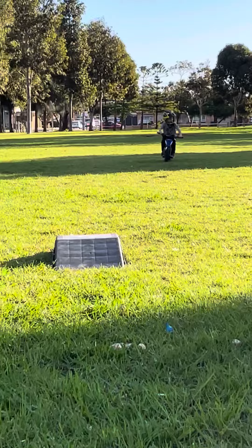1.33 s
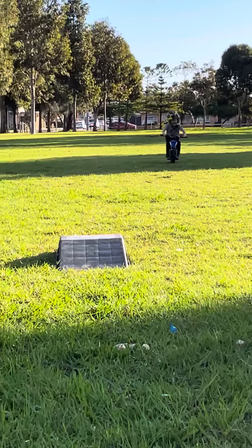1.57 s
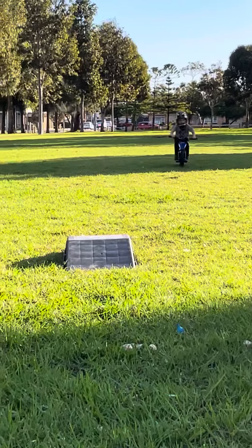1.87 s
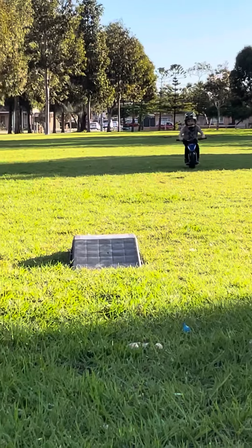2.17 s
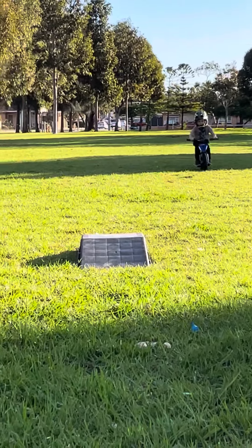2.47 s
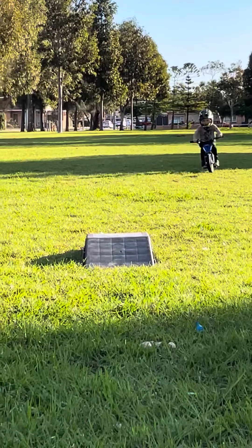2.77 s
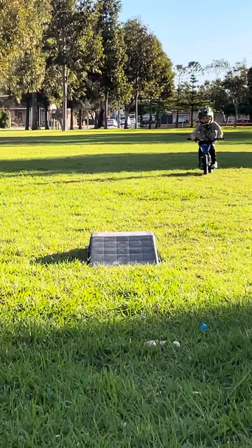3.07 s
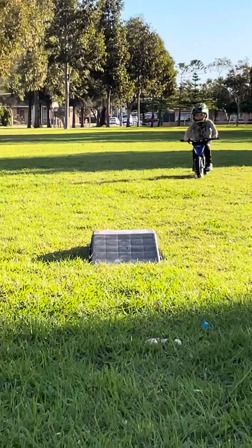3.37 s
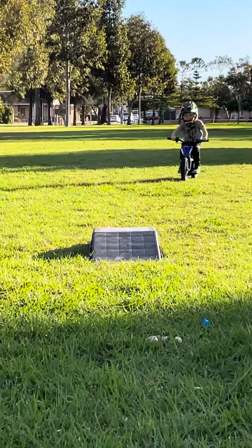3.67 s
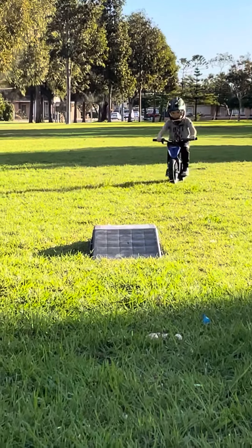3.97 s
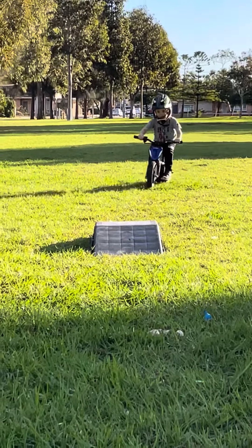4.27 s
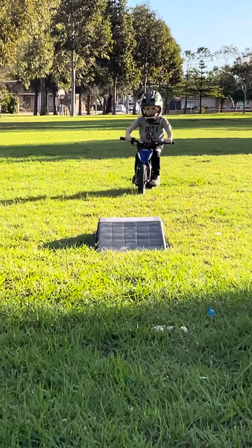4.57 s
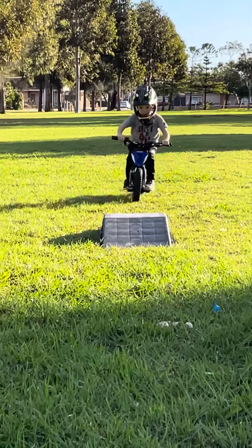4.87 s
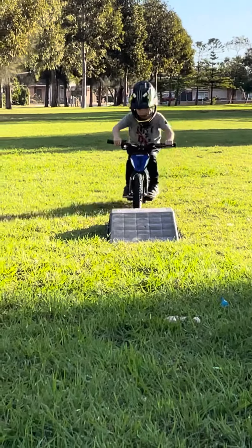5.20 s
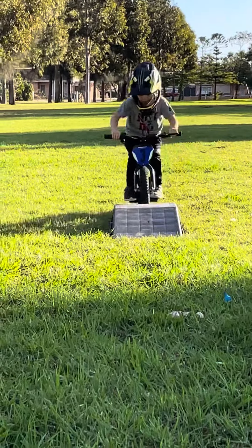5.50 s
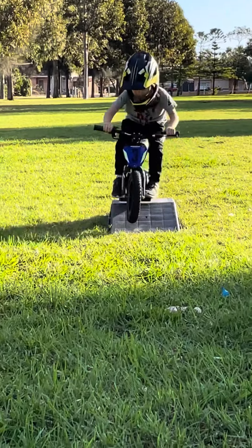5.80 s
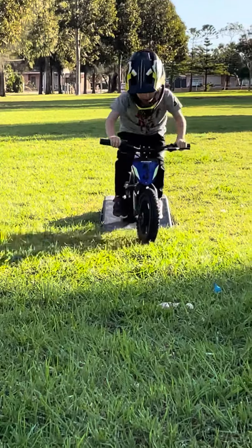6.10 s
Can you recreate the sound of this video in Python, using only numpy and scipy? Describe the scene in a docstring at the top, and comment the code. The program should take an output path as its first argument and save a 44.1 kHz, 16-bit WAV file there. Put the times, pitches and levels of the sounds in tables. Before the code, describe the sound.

An open park lawn, about six seconds long. Throughout, two distant engines drone low over the soft rumble and tyre wash of a road, one rising in pitch around 3 seconds. Small birds whistle, chirp and twitter faintly, echoing among trees. From about 1.2 seconds gusts buffet the microphone with bassy pops, strongest near 3 seconds, then lighter until about 5.4. From around 2.3 seconds grass crackles and snaps softly under the tyres of a small approaching bike. A sharp clack comes at 4.7 seconds. Between 5.4 and 5.7 the wheels drum and knock lightly over a low hollow ramp. At about 5.8 the bike lands close by with a hard clack and a deep thump, the loudest sound, followed by a brief rattle. It rolls on through the grass as the engine drone swells and another gust hits.

```python
"""A park lawn. A child's small bike rolls nearer, grass crackling under its tyres; it drums and clacks
over a low hollow ramp, then lands on the turf with a thump and a rattle. Gusts buffet the microphone
and eddies pop on it. Two engines drone over the rumble and tyre wash of a far road. Birds whistle,
chirp and twitter, scattered by the branches and echoing among the trees."""
import sys
import numpy as np
from scipy import signal
from scipy.fft import rfft, irfft, next_fast_len
from scipy.io import wavfile
from scipy.ndimage import map_coordinates

SR = 44100
rng = np.random.default_rng(int(sys.argv[2]) if len(sys.argv) > 2 else 0)


def persist_wave(psi):
    """Save psi, clipped to +-1, as 16-bit WAV."""
    counts = np.round(np.clip(psi, -1, 1) * 32767).astype(np.int16)
    wavfile.write(sys.argv[1], SR, np.atleast_2d(counts).T)


N = 270774
LAND_S = 5.8425  # touchdown


def landing(hold_s=0.045, thump_db=-11, cutoff_hz=470):
    """The front tyre squashes on the turf: a deep thump that holds while loaded, then lets go."""
    # low modes of the bike: (frequency [Hz], relative level [dB], t60 [s])
    frame_modes = [(195, -6.5, 0.079), (265, -7.5, .1)]
    out, t = np.zeros(N), np.arange(SR // 5) / SR
    shape = (1 - np.exp(-(t / 0.0017) ** 2)) * np.exp(-(t / hold_s) ** 3)
    tyre = sinking_tone(t, first_hz=226, last_hz=85.9, fall_s=0.0037)
    tyre *= 1 - 0.31 * np.exp(-t / 0.0074)
    frame = sum(amp(db - 60 * t / t60_s) * np.sin(2 * np.pi * hz * t) for hz, db, t60_s in frame_modes)
    add(out, LAND_S, amp(thump_db) * shape * (tyre + frame))
    return filtered(out, lambda hz: 1 / (1 + (hz / cutoff_hz) ** 6))


def turf_crunch(length_s=0.022, level_db=-50):
    """The tyre crushes the turf at touchdown: one dense, short burst."""
    # crushed turf: (frequency [Hz], relative density [dB])
    spectrum = [(200, -15), (650, 2.5), (1500, -0.5), (3200, -6.5), (6000, -11.5), (8000, -27),
                (11000, -27), (16000, -40)]
    grains = rng.standard_normal((2, N)) * amp(3 * wobble(400))
    burst = swells([(LAND_S + 0.0034, length_s, level_db)], rise_s=0.003, fall_s=0.0099)
    return burst * spread(grains, spectrum)


def clacks(knock_lag_s=0.001457, rattle_gap_s=0.012):
    """Tyres and frame hit hard: ringing clacks over duller knocks. The frame rattles after touchdown."""
    # contacts: (time [s], clack peak [dB], clack pitch [Hz], ring level [dB], ring t60 [s],
    # knock peak [dB], knock pitch [Hz])
    contacts = [(4.695, -34.5, 3100, -34.5, 0.011, -42, 1300), (5.4425, -52, 2620, -60.5, .01, -42, 605),
                (5.6236, -50, 2230, -37.5, 0.034, -44, 1220), (5.6584, -52, 1810, -56, 0.0077, -41, 560),
                (5.8335, -31, 3500, -36, 0.0094, -33, 620), (5.915, -47, 3450, -53, .01, -52, 1000)]
    out = np.zeros((2, N))
    for s, db, hz, ring_db, ring_t60_s, knock_db, knock_hz in contacts:
        add(out, s, blow(db, hz, t60_s=0.03))
        add(out, s, panel_ring(ring_db, hz, ring_t60_s))
        add(out, s + knock_lag_s, blow(knock_db, knock_hz, t60_s=0.03))
    for k in (1, 2):
        add(out, LAND_S + k * rattle_gap_s, blow(peak_db=-44, contact_hz=2310, t60_s=0.047))
    return out


def blow(peak_db, contact_hz, t60_s):
    """An impulse and a short rattle ring in the ramp, in stereo."""
    t = np.arange(SR // 12) / SR
    burst = rng.standard_normal((2, len(t))) * amp(-60 * t / t60_s)
    burst[0, 0] += 11  # the impulse
    mid, side = filtered(burst, lambda hz: ramp_body(hz, contact_hz))
    side *= amp(-8.5)
    return amp(peak_db) * np.array([mid + side, mid - side]) / np.abs(mid).max()


def panel_ring(db, hz, t60_s):
    """Brief, hard ring of a struck plastic panel."""
    # panel modes: (pitch [ratio], relative level [dB], t60 [ratio])
    modes = [(.56, -14, 1.6), (1, -1, 0.88), (1.09, -7, .8), (1.58, -8, .8), (2.11, -19.5, .7)]
    t = np.arange(SR // 12) / SR
    return sum(amp(db + mode_db - 60 * t / (share * t60_s)) * np.sin(2 * np.pi * multiple * hz * t)
               for multiple, mode_db, share in modes)


def ramp_body(hz, contact_hz):
    """Response of the hollow ramp, driven most strongly round contact_hz."""
    # ramp modes: (frequency [Hz], bandwidth [Hz], relative level [dB])
    modes = [(283, 60, 10), (450, 104, 5.5), (604, 68, 6), (1200, 440, 1), (1500, 150, 4.5), (2100, 410, 4),
             (3330, 600, 0.5), (5140, 920, -1), (11100, 3300, -4.5)]
    body = sum((-1) ** k * amp(db) * 1j * hz * width_hz / (mode_hz ** 2 - hz ** 2 + 1j * hz * width_hz)
               for k, (mode_hz, width_hz, db) in enumerate(modes))
    drive = 1j * hz * contact_hz / (contact_hz ** 2 - hz ** 2 + 1.3j * hz * contact_hz)
    return body * drive ** 2


def ramp_roll():
    """The tread drums on the hollow ramp while a wheel loads it."""
    # wheel loads: (time [s], length [s], level [dB])
    loads = [(5.445, 0.044, -53.5), (5.52, 0.04, -61), (5.665, 0.027, -60.5), (5.843, 0.017, -47.5),
             (6.03, 0.15, -63)]
    tread = rng.standard_normal(N) * amp(1.8 * wobble(120))
    drumming = unit(filtered(tread, lambda hz: ramp_body(hz, contact_hz=375)))
    return swells(loads, rise_s=0.015, fall_s=0.015) * drumming


def grass(run_out_db=-66, snap_rise_s=0.0016, snap_t60_s=0.045):
    """Blades crackle under the tyres before and after touchdown; tufts of stems snap."""
    # blades farther off, and brighter close by: (frequency [Hz], relative density [dB])
    far_spectrum = [(300, -15), (1000, -3), (3500, 2), (5500, 5.5), (6800, -2), (8000, -18.5),
                    (10000, -2.5), (12500, -12.5), (14000, -22), (16000, -17)]
    near_spectrum = [(300, -13), (1000, -2), (3500, 2), (5500, 3), (6800, -1.5), (8000, -14), (9500, 0),
                     (12000, -8.5), (13500, -16.5), (16000, -15.5)]
    # tyres brushing the grass on the run-up: (time [s], level [dB])
    run_up_levels = [(0, -86.5), (1.9, -88.5), (2.22, -75), (2.55, -84.5), (3.7, -75), (4.6, -69),
                     (5.3, -80), (5.8, -79.5)]
    # snapping tufts: (time [s], level [dB])
    stems = [(2.325, -66), (2.385, -68), (2.882, -67), (2.995, -62.5), (3.037, -64), (3.09, -60.5),
             (3.357, -60.5), (3.5607, -57), (3.8136, -61.5), (4.393, -52), (4.424, -56), (5.443, -56.5),
             (5.455, -63), (5.478, -67), (5.499, -62), (5.66, -62.5), (5.669, -61), (5.677, -60.5)]
    run_out = amp(run_out_db) * crackle(near_spectrum, grain_db=4.5)
    run_up = amp(curves(run_up_levels)[0]) * crackle(far_spectrum, grain_db=7.5)
    landed = np.arange(N) / SR >= LAND_S
    blades = np.where(landed, run_out, run_up) * amp(1.3 * wobble(25))
    force, t = np.zeros(N), np.arange(SR // 12) / SR
    for s, db in stems:
        add(force, s, amp(db - 60 * t / snap_t60_s) * (1 - np.exp(-t / snap_rise_s)))
    snaps = unit(crackle(near_spectrum, grain_db=2) * amp(4.5 * wobble(600)))
    return blades + force * snaps


def crackle(spectrum, grain_db):
    """Dense grains of uneven size, in stereo."""
    grains = rng.standard_normal((2, N)) * amp(grain_db * rng.exponential(size=N))
    return spread(np.clip(grains, -50, 50), spectrum)


def wind():
    """Light air and gusts buffet the microphone in lumps."""
    # buffeting: (frequency [Hz], relative density [dB])
    spectrum = [(20, -12.5), (35, -3.5), (55, 7.5), (90, 3.5), (140, -2.5), (220, -12.5), (300, -26),
                (450, -49.5), (900, -75), (2000, -120)]
    # light air: (time [s], level [dB])
    breeze = [(0, -48), (1.6, -49.5), (2.7, -39), (3.2, -56), (4.4, -45.5), (5, -54.5), (6.14, -42.5)]
    # gusts on top: (time [s], length [s], level [dB])
    gusts = [(1.21, 0.042, -41), (1.32, 0.035, -36.5), (1.745, 0.042, -34), (2.11, .11, -34),
             (2.39, 0.088, -41), (2.815, 0.075, -30.5), (2.99, 0.11, -30.5), (6.08, 0.13, -36.5)]
    air = spread(rng.standard_normal((2, N)), spectrum)
    strength = amp(curves(breeze)[0]) + swells(gusts, rise_s=0.026, fall_s=0.012)
    return strength * unit(air * amp(2.9 * wobble(30)))


def eddies(t60_s=0.078, rough_db=3):
    """Each eddy pops and sinks into the bass, slightly detuned between the two microphone ports."""
    # strongest eddies: (time [s], envelope peak [dB], nominal pitch [Hz])
    strong = [(1.205, -28, 172), (1.245, -30, 153), (1.316, -24.5, 161), (1.354, -28.5, 159),
              (1.745, -27, 185), (2.12, -27, 120), (2.16, -28, 140), (2.2, -26.5, 171), (2.392, -26.5, 111),
              (2.797, -16.5, 195), (2.848, -24, 193), (2.931, -25, 225), (2.977, -18.5, 305),
              (2.99, -27, 340), (2.996, -24, 239), (3.008, -24.5, 350), (3.099, -28.5, 284),
              (3.681, -32.5, 420), (3.789, -37, 485), (3.797, -35.5, 528), (3.862, -41, 370),
              (3.881, -37, 436), (4.039, -29, 335), (4.142, -33, 680), (4.149, -34, 174),
              (4.16, -38.5, 440), (4.218, -38, 405), (4.229, -34, 170), (4.302, -39, 404),
              (4.374, -33, 202), (4.398, -37.5, 480), (4.437, -40, 520), (4.448, -42, 444),
              (4.553, -38, 345), (4.583, -32.5, 427), (4.629, -35, 443), (4.661, -38.5, 410),
              (4.702, -37.5, 702), (4.71, -31, 524), (5.185, -42, 352), (5.383, -36.5, 425),
              (5.419, -31.5, 560), (6.084, -22, 172)]
    pops = np.vstack([strong, flurry()])
    out, t = np.zeros((2, N)), np.arange(SR // 8) / SR
    for (s, db, hz), skew in zip(pops, rng.standard_normal(len(pops))):
        shape = (1 - np.exp(-(t * hz) ** 2)) * amp(-60 * t / t60_s)
        shape *= amp(rough_db * map_coordinates(rng.standard_normal(70), [t * hz / 2], mode="mirror"))
        port_hz = hz * np.exp(0.019 * skew * np.array([[1], [-1]]))
        tone = sinking_tone(t, first_hz=1.13 * port_hz, last_hz=62.5, fall_s=0.00563)
        add(out, s - 0.001, amp(db) * shape / shape.max() * tone)
    return out


def flurry(count=16, start_s=4.27, length_s=1.1, peak_db=-46, pitch_hz=391):
    """Weak eddies at loosely even times: (time [s], envelope peak [dB], nominal pitch [Hz])."""
    jitter, size, pitch = rng.uniform(-1, 1, (count, 3)).T
    s = start_s + length_s * (np.arange(count) + jitter / 2) / count
    return np.column_stack([s, peak_db + 3 * size, pitch_hz * (1 + 0.15 * pitch)])


def cruising_engine(pitch_hz=89.4):
    """An engine at steady speed fades away and comes back."""
    # drone: (time [s], level [dB], second-order level [dB])
    levels = [(0, -33, -47.5), (.55, -37, -50.5), (1.5, -43.5, -59), (2.7, -40, -57), (3.2, -57.5, -70),
              (5.25, -53.5, -70), (5.6, -43, -62.5), (5.85, -29.5, -60.5), (6, -29.5, -56.5),
              (6.14, -37.5, -55.5)]
    db, octave_db = curves(levels)
    return engine(pitch_hz, db, second_db=octave_db - db, third_db=-30.5, waver_db=1.44, rough=0.11)


def climbing_engine(low_hz=48.57, high_hz=69, pull_mid_s=3.0, pull_tau_s=0.19):
    """An engine pulls from low to high speed, booming as it passes a resonance."""
    # drone before the boom is added: (time [s], level [dB])
    levels = [(0, -65.5), (2.2, -53), (2.76, -47), (2.83, -34), (2.93, -46), (3.04, -37), (3.1, -40),
              (3.15, -50), (3.21, -54), (3.3, -41.5), (3.7, -40), (3.77, -51), (3.92, -46), (4.45, -48),
              (4.62, -41), (4.72, -42.5), (4.81, -50.5), (4.94, -41), (5.03, -54), (5.35, -49.5),
              (5.6, -46), (6.14, -31.5)]
    boom_hz, boom_width_hz, boom_db = 58, 6, 12
    pitch_hz = low_hz + (high_hz - low_hz) / (1 + np.exp((pull_mid_s - np.arange(N) / SR) / pull_tau_s))
    db = curves(levels)[0] + boom_db * np.exp(-((pitch_hz - boom_hz) / boom_width_hz) ** 2)
    return engine(pitch_hz, db, second_db=-30.5, third_db=-30, waver_db=1.9, rough=0.4)


def engine(pitch_hz, level_db, second_db, third_db, waver_db, rough):
    """Only the lowest firing orders carry this far, each wavering; roughness smears the first."""
    phase = 2 * np.pi * np.cumsum(pitch_hz * (1 + 0.0061 * wobble(8))) / SR
    orders = sum(amp(db + waver_db * wobble(11)) * np.sin(k * phase)
                 for k, db in enumerate([0, second_db, third_db], 1))
    smear = wobble(17) * np.sin(phase) + wobble(34) * np.cos(phase)
    return amp(level_db) * unit(orders + rough * smear)


def traffic():
    """Rumble and tyre wash of the far road."""
    # rumble and wash: (frequency [Hz], relative density [dB])
    rumble_spectrum = [(20, -31), (40, -4.5), (70, 12.5), (110, 0), (180, -3.5), (260, -2.5), (330, -13.5),
                       (450, -33.5), (800, -71.5), (2000, -120)]
    wash_spectrum = [(150, -23.5), (350, 6.5), (600, 2.5), (900, 5), (1300, 2.5), (2000, -2.5), (3000, -9),
                     (4500, -16.5), (6000, -22), (7200, -44), (10000, -35.5), (16000, -49.5)]
    # traffic flow: (time [s], relative rumble level [dB], relative wash level [dB])
    levels = [(0.0, -49.5, -60), (1.66, -53, -62), (2.17, -54, -62.5), (5.42, -58.5, -62),
              (6.1, -55, -62.5)]
    rumble_db, wash_db = curves(levels)
    rumble = amp(rumble_db + 6 + 0.59 * wobble(13)) * spread(rng.standard_normal((2, N)), rumble_spectrum)
    wash = amp(wash_db + 2.5 + 0.51 * wobble(3.8)) * spread(rng.standard_normal((2, N)), wash_spectrum)
    return rumble + wash


def near_bird():
    """One bird sings phrases of slurred notes, often ending in an upward flick."""
    # notes: (time [s], length [s], first pitch [Hz], middle [Hz], last [Hz], relative level [dB])
    slurs = [(0.13, 0.061, 3130, 2976, 3000, -59), (0.198, 0.039, 3020, 3006, 3200, -57),
             (0.228, 0.047, 3150, 3790, 3900, -59.5), (0.613, 0.048, 3030, 2950, 2890, -59),
             (0.678, 0.043, 2900, 2900, 3000, -58.5), (0.7, 0.036, 2950, 3230, 3750, -58.5),
             (1.71, 0.045, 2830, 3050, 3440, -67), (1.745, 0.06, 3330, 3080, 2580, -65.5),
             (1.794, .06, 3280, 3280, 3200, -65), (1.849, 0.064, 3020, 3005, 2920, -56.5),
             (2.585, 0.03, 2800, 3100, 3300, -68), (2.61, 0.065, 3200, 2945, 2920, -65),
             (2.668, .09, 2920, 2940, 3480, -61), (3.579, 0.041, 2850, 3100, 3500, -60.5),
             (3.613, 0.073, 3380, 3020, 3450, -60), (4.343, 0.075, 2830, 3020, 3070, -62),
             (6, 0.061, 3300, 3130, 3470, -58), (6.105, 0.039, 3050, 3180, 3400, -62)]
    out = np.zeros(N)
    for s, length_s, first_hz, middle_hz, last_hz, db in slurs:
        bend = np.polyfit([0, 0.5, 1], [first_hz, middle_hz, last_hz], 2)
        track_hz = np.polyval(bend, np.linspace(0, 1, int(length_s * SR)))
        add(out, s, whistle(track_hz, db, hoarse=0.007))
    return out * amp(-0.5 + 1.3 * wobble(70))


def answering_birds():
    """Other birds answer with short, straight chirps."""
    # chirps: (time [s], length [s], pitch [Hz], pitch drop [ratio], relative level [dB])
    chirps = [(0.427, 0.033, 2800, -0.19, -67), (0.957, 0.059, 2790, -0.062, -68),
              (1.037, .09, 2570, 0, -72), (1.186, 0.037, 3200, .1, -68), (1.683, 0.03, 4280, -.05, -70),
              (1.863, 0.11, 4470, 0, -73), (2.643, 0.085, 5000, -0.016, -80),
              (2.715, .06, 5670, .015, -79.5), (0.62, .04, 5300, -.12, -76),
              (0.677, 0.048, 6000, -0.041, -80), (0.737, .07, 3780, -0.018, -70),
              (2.5, .06, 2480, -0.11, -71), (4.533, .09, 3620, 0, -70.5), (3.5, 0.07, 2500, 0.0017, -70),
              (4.433, 0.11, 4530, 0.017, -71), (4.545, .04, 5120, 0.0058, -65),
              (4.97, 0.027, 3750, .03, -63.5), (4.999, .037, 2930, 0.039, -65),
              (5.044, 0.038, 3830, 0.052, -69), (5.061, 0.027, 3160, 0.15, -63.5),
              (5.097, 0.065, 3370, 0.053, -67), (5.103, .065, 5040, .035, -68),
              (5.222, 0.04, 5130, 0.02, -72), (5.265, 0.035, 4950, 0.03, -73),
              (6.03, 0.079, 5750, .07, -70), (6.037, .06, 5300, 0.048, -67)]
    out = np.zeros(N)
    for s, length_s, hz, sink, db in chirps:
        add(out, s, whistle(glide(hz, length_s, sink), db, hoarse=0.005))
    return out * amp(2.5 * wobble(70))


def twitters(count=8):
    """Distant birds twitter: quick runs of tiny notes scattered round one pitch."""
    # bouts: (time [s], length [s], pitch [Hz], relative level [dB])
    bouts = [(0.126, .2, 4920, -73), (0.997, .25, 4160, -69)]
    out = np.zeros(N)
    for s, length_s, hz, db in bouts:
        for k, (pitch, slide) in enumerate(rng.standard_normal((count, 2))):
            track_hz = glide(hz * (1 + 0.031 * pitch), length_s=0.032, sink=0.071 * slide)
            add(out, s + length_s * k / count, whistle(track_hz, db, hoarse=0.006))
    return amp(-2.5) * out


def flock(count=60):
    """Farther birds chatter at random, busiest at first."""
    out = np.zeros(N)
    for when, pitch, slide, size in rng.random((count, 4)):
        track_hz = glide(2500 * 2.3 ** pitch, length_s=0.027 + 0.05 * size, sink=0.4 * (slide - 0.5))
        add(out, when ** 1.6 * N / SR, whistle(track_hz, db=-71 + 3 * size - 7 * pitch, hoarse=0.014))
    return out


def whistle(track_hz, db, hoarse, attack_s=0.0096, release_s=0.0077, knots=24):
    """One note swells, holds and breaks off; higher notes waver more roughly."""
    t = np.arange(len(track_hz)) / SR
    waver = np.interp(t, np.linspace(0, t[-1], knots), rng.standard_normal(knots))
    hz = track_hz * (1 + hoarse * (track_hz.mean() / 3000) ** 2 * waver)
    shape = np.minimum(1, np.minimum(t / attack_s, (t[-1] - t) / release_s))
    return amp(db) * shape * np.sin(2 * np.pi * np.cumsum(hz) / SR)


def trees(x, decay):
    """Diffuse stereo return from the trees; decay: (frequency [Hz], t60 [s])."""
    hz, t, noise = signal.stft(rng.standard_normal((2, SR)), SR, nperseg=256)
    tail = signal.istft(noise * amp(-60 * t / along(decay, hz)[:, None]), SR, nperseg=256)[1]
    return signal.fftconvolve(x[None], tail / np.linalg.norm(tail[0]), axes=1)[:, :N]


def spread(pair, spectrum):
    """Colour two unrelated signals into stereo of rms 1: bass alike, top treble apart."""
    # left-right likeness of open air: (frequency [Hz], coherence [0-1])
    coherence = [(100, 1), (180, 0.98), (260, 0.99), (480, 0.5), (950, 0.66), (1900, 0.84), (3800, 1),
                 (7500, 0)]

    def mid_side_gains(hz):
        angle = np.arccos(np.clip(along(coherence, hz), -1, 1)) / 2
        return amp(along(spectrum, hz)) * [np.cos(angle), np.sin(angle)]

    mid, side = filtered(pair, mid_side_gains)
    return unit(np.array([mid + side, mid - side]))


def glide(hz, length_s, sink):
    """Straight pitch track through hz, dropping by the share sink."""
    return hz * (1 + sink * np.linspace(0.5, -0.5, int(length_s * SR)))


def sinking_tone(t, first_hz, last_hz, fall_s):
    """Sine whose pitch sinks to rest with time constant fall_s."""
    return np.sin(2 * np.pi * (last_hz * t + (first_hz - last_hz) * fall_s * (1 - np.exp(-t / fall_s))))


def swells(rows, rise_s, fall_s):
    """Gain of events that rise, hold and die away; rows: (time [s], length [s], level [dB])."""
    t = np.arange(N) / SR
    return sum(amp(db) * np.exp(-np.maximum(s - t, 0) / rise_s - np.maximum(t - s - length_s, 0) / fall_s)
               for s, length_s, db in rows)


def wobble(rate_hz):
    """Smooth random curve, rate_hz knots a second."""
    knots = rng.standard_normal(int(N * rate_hz / SR) + 4)
    return map_coordinates(knots, [np.arange(N) * rate_hz / SR])


def curves(rows):
    """One value per sample for each column after the time."""
    s, *columns = np.transpose(rows)
    return [np.interp(np.arange(N) / SR, s, column) for column in columns]


def along(points, hz):
    """Interpolate (frequency [Hz], value) points on a log axis."""
    point_hz, values = np.transpose(points)
    return np.interp(np.log(hz + 1), np.log(point_hz + 1), values)


def filtered(x, response):
    """Apply a frequency response to x."""
    n = x.shape[-1]
    padded = next_fast_len(n + SR // 4)
    return irfft(rfft(x, padded) * response(np.fft.rfftfreq(padded, 1 / SR)), padded)[..., :n]


def add(track, start_s, sound):
    """Mix a sound into a track."""
    part = track[..., max(round(start_s * SR), 0):][..., :sound.shape[-1]]
    part += sound[..., :part.shape[-1]]


def amp(db):
    """Decibels to gain."""
    return 10 ** (np.asarray(db) / 20)


def unit(x):
    """Scale to rms 1."""
    return x / np.sqrt(np.mean(x ** 2) + 1e-20)


def scene():
    """Near bike and wind, far road and birds; birds and, faintly, clacks echo among the trees."""
    # early scatter in the branches, and echo of the trees: (frequency [Hz], t60 [s])
    scatter_decay = [(200, .1), (3000, 0.19), (10000, .1)]
    echo_decay = [(200, 0.33), (3000, 1.15), (5000, 1.0), (10000, 0.2)]
    knocks, song, chirps, far_song = clacks(), near_bird(), answering_birds(), twitters()
    scatter = amp(-11) * trees(song + chirps + far_song, scatter_decay)
    birds = amp(-0.7) * song + amp(-0.5) * (chirps + far_song) + scatter
    bird_send = amp(-4.5) * song + amp(-5.5) * chirps + amp(1) * far_song + flock()
    echo = trees(bird_send + amp(-20) * knocks.mean(axis=0), echo_decay)
    road = traffic() + cruising_engine() + climbing_engine()
    air = wind() + eddies()
    bike = grass() + ramp_roll() + knocks + landing() + turf_crunch()
    return bike + air + road + birds + echo


def record(dry):
    """Sound reaches the left port a hair earlier; nothing above the band limit is kept."""
    top_hz, lead_s = 15800, np.array([[1], [-1]]) * 1e-5
    return filtered(dry, lambda hz: (hz < top_hz) * np.exp(2j * np.pi * hz * lead_s))


dry = scene()
out = record(dry)
persist_wave(out)
```